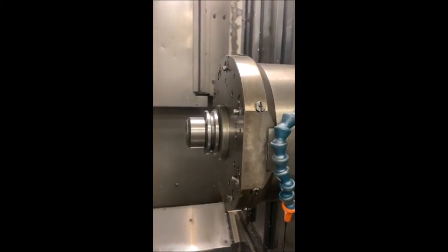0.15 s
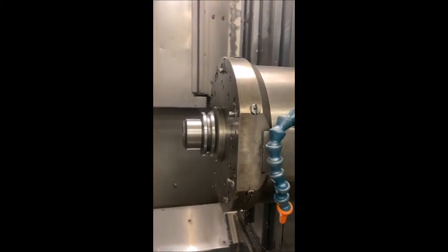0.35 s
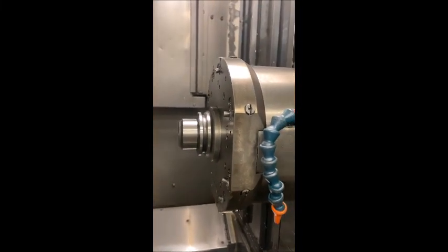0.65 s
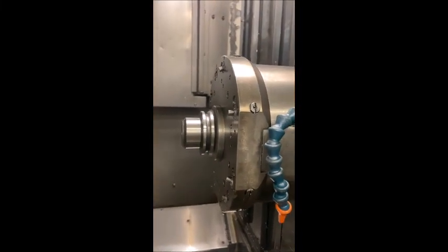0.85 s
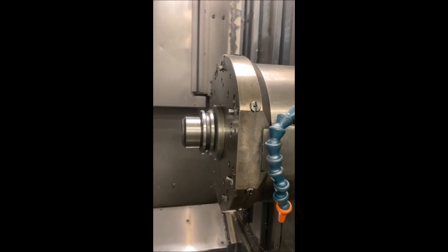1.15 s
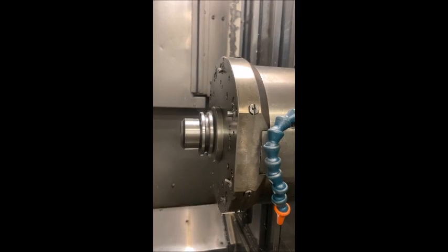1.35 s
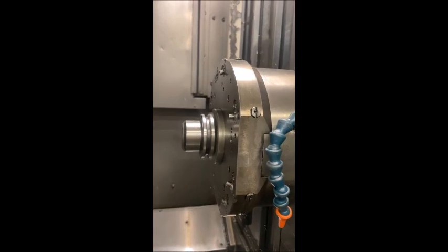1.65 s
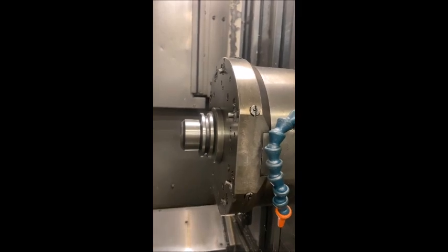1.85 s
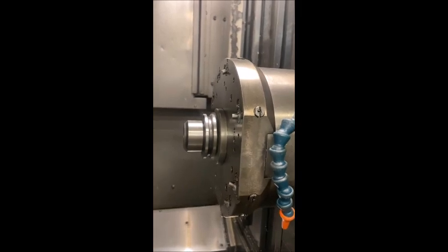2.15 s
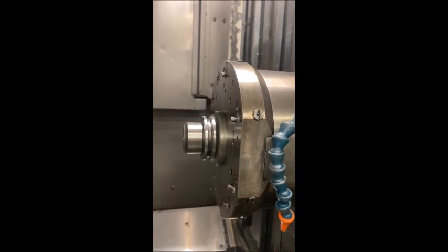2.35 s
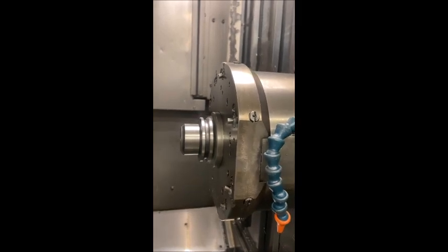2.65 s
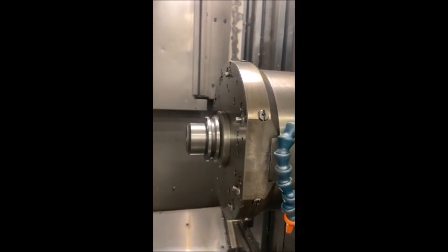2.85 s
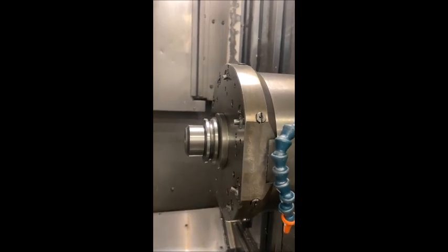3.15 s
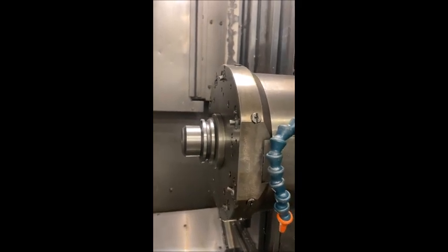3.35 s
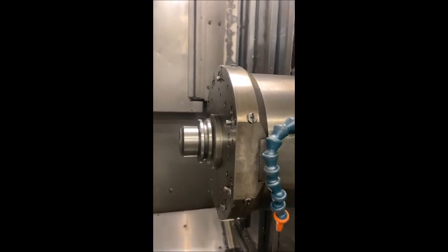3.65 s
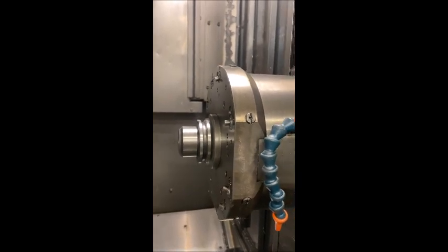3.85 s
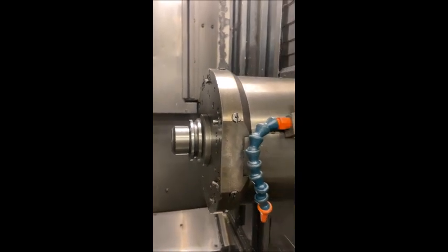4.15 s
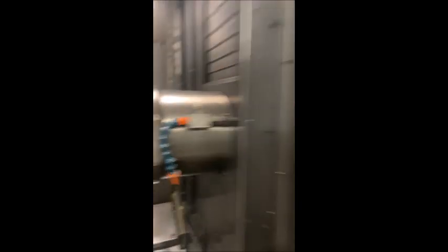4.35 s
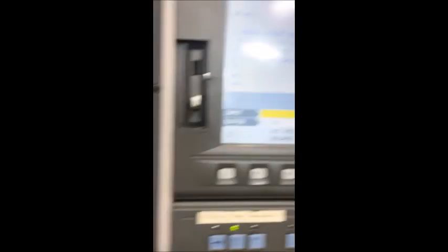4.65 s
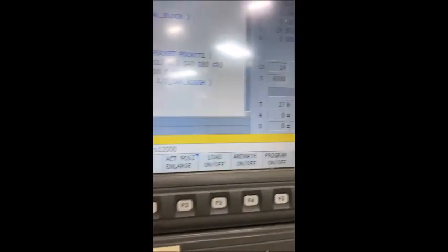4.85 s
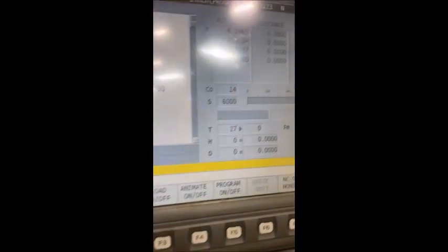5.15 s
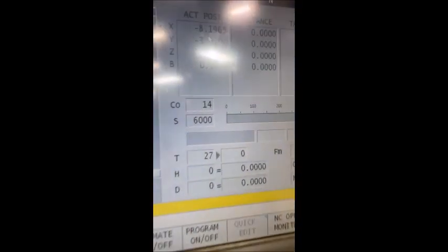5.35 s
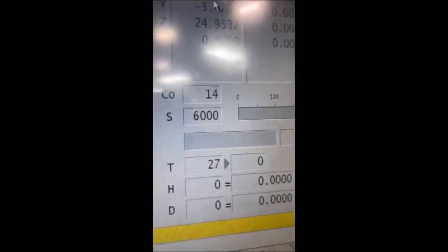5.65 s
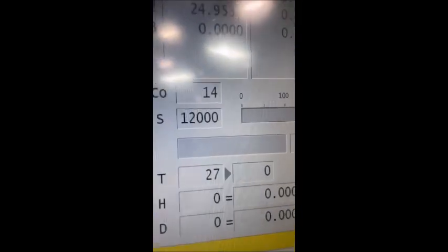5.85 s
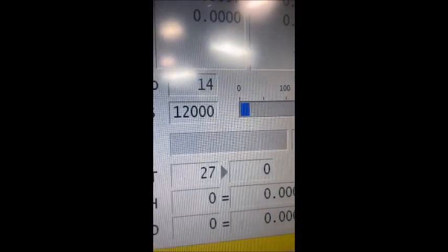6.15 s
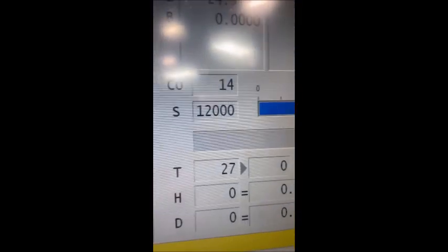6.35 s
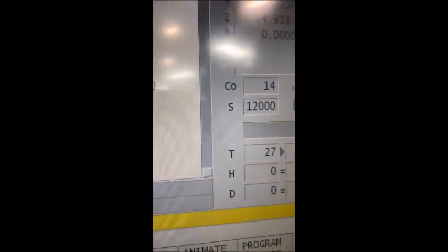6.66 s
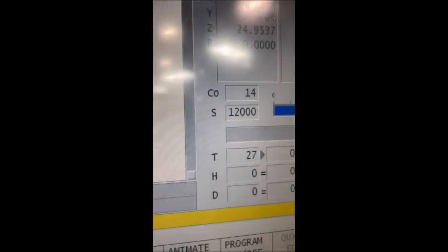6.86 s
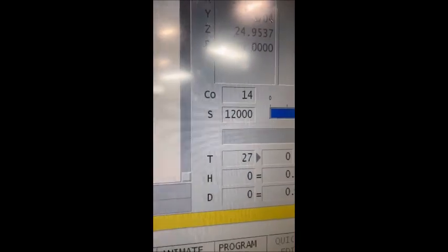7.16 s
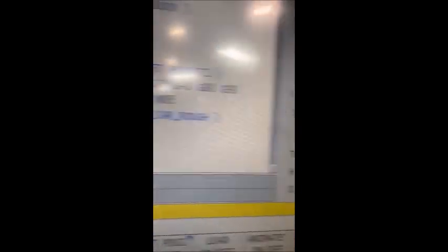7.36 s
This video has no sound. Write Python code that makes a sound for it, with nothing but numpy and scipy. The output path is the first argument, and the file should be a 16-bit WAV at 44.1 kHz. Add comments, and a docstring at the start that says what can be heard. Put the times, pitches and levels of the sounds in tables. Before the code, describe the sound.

Steady machine spindle drone with airy hiss, a swing away to muffled shop hum, then a swift electric run-up settling an octave higher.

```python
"""The unloaded spindle of a machining centre turns at 6000 rpm, then runs up to 12000 rpm:
unbalance shakes the frame once a turn, bearings and housing add tones at multiples of the shaft speed.
The drive whines while it pulls, smeared by the steel walls; seal air hisses and windage grows with speed.
Mains hum, fans and pumps are steady tones over shop noise; one pump's drone swings in level.
A phone starts inside the enclosure and swings out to the control panel before the run-up."""
import sys
import numpy as np
from scipy import signal
from scipy.fft import rfft, irfft
from scipy.io import wavfile
from scipy.ndimage import uniform_filter1d

SR = 44100
rng = np.random.default_rng(int(sys.argv[2]) if len(sys.argv) > 2 else 0)


def digitize_waveform(pressure):
    """Quantize a signal to 16-bit integers and store it at the path in sys.argv[1].

    Rows of a 2-D input are taken as channels; values are limited to [-1, 1].
    """
    field = np.atleast_2d(pressure).T
    bounded = np.clip(field, -1, 1)
    quanta = np.round(bounded * 32767).astype(np.int16)
    wavfile.write(sys.argv[1], SR, quanta)


N = 331191
T = np.arange(N) / SR
F = np.maximum(np.fft.rfftfreq(N, 1 / SR), 1)
IDLE_HZ, FULL_HZ = 100, 200  # shaft turns per second


def undb(db):
    """Decibels to gain."""
    return 10 ** (np.asarray(db) / 20)


def colour(points, hz):
    """Gain at hz of a spectrum drawn in dB over log frequency."""
    point_hz, point_db = np.transpose(points)
    return undb(np.interp(np.log(hz), np.log(point_hz), point_db))


def resonance(hz, modes):
    """Gain at hz of a set of resonant peaks."""
    return undb(sum(peak_db / (1 + (2 * (hz - centre_hz) / width_hz) ** 2)
                    for centre_hz, width_hz, peak_db in modes))


def level(points):
    """Gain over time of a level track."""
    return undb(np.interp(T, *np.transpose(points)))


def walk(knots_per_s):
    """Random track: straight lines between normal knots of standard deviation 1.75."""
    knots = rng.standard_normal(1024)
    return 1.75 * np.interp(T * knots_per_s, np.arange(len(knots)), knots)


def ease(middle_s, length_s):
    """A move of the hand from 0 to 1 that eases in and out."""
    return .5 + .5 * np.sin(np.pi * np.clip((T - middle_s) / length_s, -.5, .5))


LEAD_HZ = 1384
# stereo width, ports in agreement in the bass and opposed in the treble: hz, side_minus_mid_db
PORT_WIDTH = [(100, -37), (250, -18), (400, -5), (900, 4.5), (1500, 0), (2000, -4.5), (3000, 2),
              (4200, -2.5), (5500, -6), (7000, 4.5), (8600, 11), (9800, 56)]


def ports(hz):
    """Mid and side weights at hz; the right port leads below LEAD_HZ, the left one above."""
    angle = np.arctan(colour(PORT_WIDTH, hz))
    return np.cos(angle), np.sin(angle) * np.sign(hz - LEAD_HZ)


def tone(phase, hz, waver, rate, pan_db=0):
    """A line of rms near 1 that wavers in size and phase and reaches the two ports out of step."""
    mid, side = ports(hz)
    lead = np.arctan2(side, mid)
    phase = phase + waver * walk(rate)
    right = undb(-pan_db)
    size = (1 + waver * walk(rate)) * 2 / np.sqrt(1 + right ** 2)
    return size * np.array([np.cos(phase + lead), right * np.cos(phase - lead)])


def standing_waves(db_per_unit, spacing_hz=45):
    """Close steel walls cut fine peaks and notches into the midrange and treble."""
    knots = rng.standard_normal(2048)
    pattern = np.interp(F / spacing_hz, np.arange(len(knots)), knots)
    return undb(db_per_unit * np.minimum(F / 2000, 1) * pattern)


# flutter of turbulence: gain per unit of walk, knots per second, width of a band
FLUTTER_DB_PER_UNIT, FLUTTER_KNOTS_PER_S, FLUTTER_OCTAVES = 1.2, 18, .08
# balance of a source off to one side: hz, left_minus_right_db
SIDE_BALANCE = [(280, 2), (520, -2), (750, 1.5), (950, -7.5), (1900, -2.5), (3000, -1.1), (5300, -2.5),
                (7000, 1)]


def noise(points, modes=(), direct=.5, lean=0, count=5):
    """Stereo noise with a spectrum and resonances; the direct share reaches both ports, out of step."""
    gain = colour(points, F) * np.sqrt(SR / 2) * standing_waves(2) * resonance(F, modes)
    source, diffuse = rfft(rng.standard_normal((2, N))) * gain
    mid_gain, side_gain = ports(F)
    mid = source * mid_gain
    side = (diffuse + 1j * direct * source) * side_gain / np.sqrt(1 + direct ** 2)
    # the balance applies below its last frequency
    left = colour(SIDE_BALANCE, F) ** (lean / 2 * (F < SIDE_BALANCE[-1][0]))
    both = np.array([(mid + side) * left, (mid - side) / left])
    # neighbouring bands flutter each in their own way
    group = np.floor(np.log2(F) / FLUTTER_OCTAVES) % count
    out = np.zeros((2, N))
    for k in range(count):
        flutter = undb(FLUTTER_DB_PER_UNIT * walk(FLUTTER_KNOTS_PER_S))
        out += irfft(both * (group == k), N) * flutter
    return out


def enclosure(x, t60_s=.58, direct=.7):
    """Steel walls smear a sound into a dense tail, different at each port."""
    tail = rng.standard_normal((2, SR)) * undb(-60 * T[:SR] / t60_s)
    tail /= np.sqrt(np.sum(tail ** 2, axis=1)[:, None])
    mid, side = signal.fftconvolve(x[None], tail, axes=1)[:, :N]
    mid_gain, side_gain = ports(F)
    mid = irfft(rfft(mid + direct * x) * mid_gain, N)
    side = irfft((rfft(side) + 1j * direct * rfft(x)) * side_gain, N)
    return np.array([mid + side, mid - side]) / np.sqrt(1 + direct ** 2)


ENCLOSURE_START_DB, SHOP_START_DB = 0, -16
# the phone drifts, swings out, turns to the panel: middle_s, length_s, enclosure_change_db, shop_change_db
PHONE_MOVES = [(2.2, 5.3, 0.45, 5), (4.438, 0.64, -11, 10), (5.44, 0.43, -10, 1.84)]


def place():
    """Gains of enclosure and shop at the phone."""
    inside_db, shop_db = ENCLOSURE_START_DB, SHOP_START_DB
    for middle_s, length_s, enclosure_change_db, shop_change_db in PHONE_MOVES:
        done = ease(middle_s, length_s)
        inside_db = inside_db + enclosure_change_db * done
        shop_db = shop_db + shop_change_db * done
    return undb(inside_db), undb(shop_db)


BACK_S, BACK_LENGTH_S, BACK_RISE_DB = 7.07, .5, 3.5


def turn_back():
    """Gain of housing and windage as the phone turns back towards the door."""
    return undb(BACK_RISE_DB * (ease(BACK_S, BACK_LENGTH_S) - .5))


# shop noise, before place gain and resonances: hz, density_db_per_hz
SHOP_SPECTRUM = [(25, -73), (50, -65.5), (100, -58.5), (170, -57.5), (300, -60), (420, -65), (900, -69.5),
                 (1200, -69), (1700, -75), (2100, -75.5), (3200, -70.5), (4200, -78), (6000, -82),
                 (10500, -104.5), (15500, -104)]
# resonances of pumps and panels: centre_hz, width_hz, peak_db
SHOP_RESONANCES = [(249, 18, 6), (512, 32, 8.5), (771, 20, 10.5), (900, 10, 13), (965, 45, 8),
                   (2710, 40, 4), (3300, 160, 2.2)]
# mains hum, pumps and fans: pitch_hz, level_inside_db, level_at_panel_db
HUM_LINES = [(42.4, -45, -49), (60, -34.5, -39.5), (72.8, -42, -49.5), (120.2, -38.5, -30.5),
             (164.9, -44.5, -41), (175.2, -51.5, -42.5), (230, -60.5, -52.5), (241.7, -49.5, -35),
             (267.3, -41, -46), (297.7, -55.5, -46.5), (347, -49, -52.5), (508, -62.5, -45),
             (531.3, -50, -53), (782, -50, -58)]
PUMP_HZ, PUMP_SLIP_RAD_PER_UNIT = 257, .6
# level of the pump's drone: time_s, level_db
PUMP_LEVEL_TRACK = [(4.35, -63), (4.38, -42.5), (4.67, -30), (4.71, -49), (4.75, -22.5), (4.79, -41),
                    (4.95, -27.5), (5.0, -44), (5.06, -31), (5.23, -39), (5.24, -31), (5.35, -32),
                    (5.38, -22.5), (5.52, -48), (5.63, -28.5), (5.68, -40), (5.74, -29), (5.8, -49),
                    (5.88, -29), (5.91, -38.5), (6.09, -26), (6.25, -37.5), (6.32, -23), (6.37, -40),
                    (6.67, -28), (6.68, -46), (6.77, -38), (6.81, -43), (6.87, -26.5), (6.95, -40),
                    (7.03, -20.5), (7.22, -42), (7.39, -30), (7.41, -41), (7.45, -32), (7.5, -41)]


def machines(shop):
    """Steady hum lines over shop noise; a pump's drone of unsteady phase swings in level among them."""
    out = shop * noise(SHOP_SPECTRUM, SHOP_RESONANCES, direct=.15)
    outside = (shop - shop.min()) / np.ptp(shop)
    for pitch_hz, inside_db, panel_db in HUM_LINES:
        phase = 2 * np.pi * (pitch_hz * T + rng.random())
        line = tone(phase, pitch_hz, waver=min(pitch_hz / 1200, .6), rate=10)
        out += undb(inside_db + outside * (panel_db - inside_db)) * line
    pump_phase = 2 * np.pi * PUMP_HZ * T + PUMP_SLIP_RAD_PER_UNIT * walk(20)
    drone = tone(pump_phase, PUMP_HZ, waver=.1, rate=13)
    return out + level(PUMP_LEVEL_TRACK) * drone


KNOCK_S, KNOCK_HZ, KNOCK_DB = 5.405, 705, -35
# handling thuds: middle_s, pitch_hz, peak_db
THUDS = [(4.39, 49.3, -23.5), (7.35, 68, -30)]


def bumps(half_length_s=0.032, t60_s=0.25):
    """Handling of the phone: Gaussian low-pitched thuds, and a faint decaying ring as it knocks the panel."""
    out = np.zeros(N)
    for middle_s, pitch_hz, peak_db in THUDS:
        t = T - middle_s
        out += undb(peak_db) * np.exp(-(t / half_length_s) ** 2) * np.sin(2 * np.pi * pitch_hz * t)
    t = np.maximum(T - KNOCK_S, 0)
    return out + undb(KNOCK_DB - 60 * t / t60_s) * np.sin(2 * np.pi * KNOCK_HZ * t)


DOOR_S, DOOR_HALF_S, DOOR_DB = 4.54, 0.14, 4.5
# seal air hiss, before place gain, balance and resonances: hz, density_db_per_hz
HISS_SPECTRUM = [(25, -83), (50, -58.5), (90, -67), (170, -55), (260, -59), (400, -72.5), (700, -67),
                 (1400, -68), (2100, -76.5), (3000, -70), (4000, -74.5), (7000, -82.5), (10500, -86.5),
                 (15500, -94.5)]
# resonances of the enclosure: centre_hz, width_hz, peak_db
HISS_RESONANCES = [(336, 23, 4.6), (915, 50, 4), (960, 50, 9), (1520, 180, 1.5), (1870, 110, 6),
                   (2590, 150, 6.5), (2870, 100, 6), (3130, 55, 9), (3240, 80, 7), (3420, 90, 4.5),
                   (3540, 120, 10.5), (4140, 70, 4.5), (4350, 150, 3), (4540, 50, 5), (4770, 50, 4.5),
                   (4950, 80, 7.5), (5040, 70, 9.5), (5210, 110, 7), (5350, 90, 13), (6330, 140, 4),
                   (6800, 900, 6.5), (8730, 860, 9.8)]


def seal_air(inside):
    """Seal air hisses through the enclosure and flares as the phone passes the door opening."""
    hiss = noise(HISS_SPECTRUM, HISS_RESONANCES, direct=0.89, lean=1)
    door = undb(DOOR_DB * np.exp(-((T - DOOR_S) / DOOR_HALF_S) ** 2))
    return inside * door * hiss


# air dragged round at full speed, before turn-back gain and resonances: hz, density_db_per_hz
WINDAGE_SPECTRUM = [(100, -61), (330, -72.5), (600, -66), (800, -76.5), (1200, -79), (2000, -74),
                    (3200, -81.5), (4400, -77), (6000, -75.5), (8000, -80), (11000, -86), (15500, -101)]
# resonances of the housing that this air excites: centre_hz, width_hz, peak_db
WINDAGE_RESONANCES = [(1960, 120, -1), (2480, 160, 4), (3230, 110, 9), (4180, 160, 9), (4630, 250, 3)]


def windage(speed):
    """Air dragged round by the shaft; its gain grows in a straight line with speed above idle."""
    rise = (speed - IDLE_HZ) / (FULL_HZ - IDLE_HZ)
    return rise * turn_back() * noise(WINDAGE_SPECTRUM, WINDAGE_RESONANCES, direct=.2)


PULL_S, RELEASE_S, SWITCH_S = 5.901, 6.868, .004
WHINE_SOURCE_DB = -38  # before casing and walls
# rotor slots: multiple_of_speed, relative_level_at_full_speed_db, power_of_speed
SLOT_LINES = [(44, 0, 0), (36, -5.5, 6)]
# resonances of the motor casing that the whine sweeps through: centre_hz, width_hz, peak_db
CASING_RESONANCES = [(4510, 110, 4.5), (5270, 160, 4), (5780, 520, 11.5), (7240, 220, 9), (8750, 300, 3)]


def drive(speed, angle, ripple_rad_per_unit=.62):
    """Rotor slots whine magnetically only while the motor pulls; torque ripple roughens, walls smear."""
    wobble = ripple_rad_per_unit * walk(100)
    whine = np.zeros(N)
    for order, relative_db, power in SLOT_LINES:
        whine += undb(relative_db) * (speed / FULL_HZ) ** power * np.cos(order * angle + wobble)
    pull = np.clip(np.minimum(T - PULL_S, RELEASE_S - T) / SWITCH_S, 0, 1)
    # the first slot line's pitch sets the casing gain for all
    casing = resonance(SLOT_LINES[0][0] * speed, CASING_RESONANCES)
    return enclosure(np.sqrt(2) * undb(WHINE_SOURCE_DB) * pull * casing * whine)


# housing tones, before resonances and turn-back gain: multiple_of_speed, level_at_full_speed_db
HOUSING_LINES = [(2, -40.5), (3, -51.5), (7, -53), (9.34, -53), (11.385, -53), (12, -53), (12.7, -53),
                 (16, -53), (22.32, -59), (22.66, -59)]
# resonances of the housing that its tones sweep through: centre_hz, width_hz, peak_db
HOUSING_RESONANCES = [(340, 42, 2.5), (405, 22, 7.5)]


def housing(speed):
    """Gain over time of the housing tones: the turn-back gain times the seventh power of the speed."""
    return turn_back() * (speed / FULL_HZ) ** 7


def housing_lines(speed, angle):
    """The housing radiates shaft multiples, growing with the seventh power of speed."""
    out = np.zeros((2, N))
    growth = housing(speed)
    for order, level_db in HOUSING_LINES:
        line = tone(order * angle, order * FULL_HZ, waver=min(.025 * order ** 2, .8), rate=36)
        out += undb(level_db) * growth * resonance(order * speed, HOUSING_RESONANCES) * line
    return out


DAMPED_HZ = 6700  # the housing swallows bearing tones above this pitch
# shaft harmonics and, off the whole numbers, bearing tones, before reach and damping:
# multiple_of_speed, level_db, left_minus_right_inside_db
BEARING_LINES = [(9, -42, -7.5), (10, -47.5, -15), (10.55, -51, -10), (11.475, -35.3, -14),
                 (11.935, -36, -1), (13, -56, -12), (14, -57, -10), (15, -56, -2), (16, -50, -15),
                 (18, -47, -13), (22.49, -55, 0), (22.95, -50, 2.5), (23.41, -53, -5), (25, -52, 5),
                 (25.62, -52, 0), (26.49, -51, 0), (27, -53, -4.5), (29, -50.5, -3), (34, -50.5, 3),
                 (34.48, -55, 6), (43, -56, 0), (44, -55.5, 0), (53.1, -55, -3), (63, -59, 0)]
# bearing tones drop as the phone clears the door and again at the panel: time_s, gain_db
BEARING_REACH = [(0, -1), (2.6, 0), (3.3, 1.5), (4.2, 0), (4.45, -4), (4.56, -8), (5.3, -7.5), (5.55, -19)]


def bearings(speed, angle, inside):
    """Bearing tones at multiples of the speed; high orders magnify small unsteadiness of the balls."""
    out = np.zeros((2, N))
    near = np.minimum(inside, 1)
    reach = level(BEARING_REACH)
    for order, level_db, pan_db in BEARING_LINES:
        waver = min(0.00082 * order ** 2, .65)
        line = tone(order * angle, order * IDLE_HZ, waver=waver, rate=18, pan_db=pan_db * near)
        damping = 1 / (1 + (order * speed / DAMPED_HZ) ** 16)
        out += undb(level_db) * reach * damping * line
    return out


MOUNT_IDLE_DB, MOUNT_DB_PER_OCTAVE = -30.5, -15.5  # mounts isolate better as the speed rises
# resonances of the frame that the unbalance shakes: centre_hz, width_hz, level_db
FRAME_RESONANCES = [(122.1, 2.8, -14.5), (131, 1.7, -14.6), (151.7, 5.5, -25.2), (167.9, 7.9, -21.9),
                    (182.4, 3.8, -29.2), (199.7, 1.2, -19.3)]


def frame(speed, angle):
    """Unbalance pushes once a turn; each frame mode swells as the speed reaches it and rings on behind."""
    push = tone(angle, IDLE_HZ, waver=.02, rate=5)
    mount_db = MOUNT_IDLE_DB + MOUNT_DB_PER_OCTAVE * np.log2(speed / IDLE_HZ)
    out = undb(mount_db) * push
    for k, (centre_hz, width_hz, level_db) in enumerate(FRAME_RESONANCES):
        b, a = signal.iirpeak(centre_hz, centre_hz / width_hz, fs=SR)
        # neighbouring modes move the panels in opposite directions
        out += (-1) ** k * undb(level_db) * signal.lfilter(b, a, push)
    return out


def spindle(speed, angle, inside):
    """Unbalance hums once a turn; the bearings sing inside; the housing joins in near full speed."""
    return frame(speed, angle) + bearings(speed, angle, inside) + housing_lines(speed, angle)


RAMP_S, RAMP_HZ_PER_S, KNEE_HZ = 5.933, 180, 131
LIMIT_HZ, DRAG_PER_S = 368, .29  # the drag alone would level the speed off at LIMIT_HZ
EASE_S = .09  # the controller rounds the corners


def shaft_speed():
    """Turns a second: idle, constant torque to the knee, constant power against drag, full speed."""
    ramp = IDLE_HZ + RAMP_HZ_PER_S * (T - RAMP_S)
    past_knee_s = np.maximum(ramp - KNEE_HZ, 0) / RAMP_HZ_PER_S
    shortfall = (LIMIT_HZ ** 2 - KNEE_HZ ** 2) * np.exp(-DRAG_PER_S * past_knee_s)
    powered = np.sqrt(LIMIT_HZ ** 2 - shortfall)
    speed = np.clip(np.minimum(ramp, powered), IDLE_HZ, FULL_HZ)
    return uniform_filter1d(speed, size=int(EASE_S * SR))


SWING_S, SWING_LENGTH_S, SWING_M, SOUND_M_PER_S = 4.45, .5, .5, 343


def shaft_angle(speed):
    """Shaft angle in radians as heard; the pitch sags while the phone swings away."""
    late_s = SWING_M * ease(SWING_S, SWING_LENGTH_S) / SOUND_M_PER_S
    return 2 * np.pi * (np.cumsum(speed) / SR - speed * late_s)


def scene():
    """One shaft speed plays every spindle sound; the phone's place mixes enclosure and shop."""
    speed = shaft_speed()
    angle = shaft_angle(speed)
    inside, shop = place()
    background = machines(shop) + bumps()
    air = seal_air(inside) + windage(speed)
    return background + air + drive(speed, angle) + spindle(speed, angle, inside)


def record(dry):
    """The phone drops the deepest rumble and cuts the top."""
    rumble_cut = signal.butter(2, 22, "high", fs=SR, output="sos")
    top_cut = signal.ellip(8, .2, 70, 15600, fs=SR, output="sos")
    return signal.sosfilt(top_cut, signal.sosfilt(rumble_cut, dry))


dry = scene()
out = record(dry)
digitize_waveform(out)
```